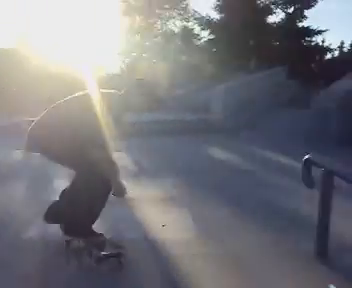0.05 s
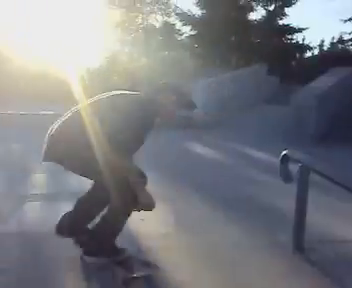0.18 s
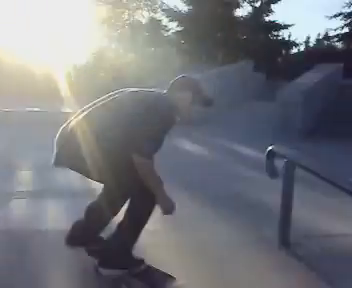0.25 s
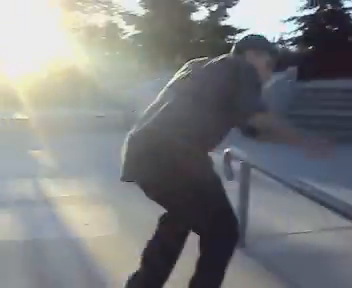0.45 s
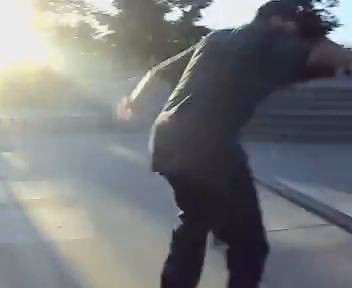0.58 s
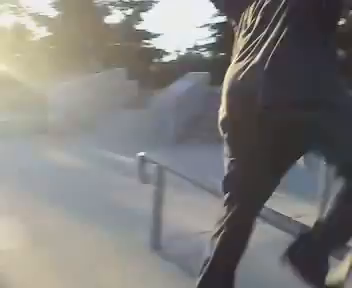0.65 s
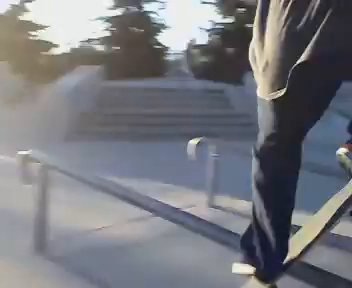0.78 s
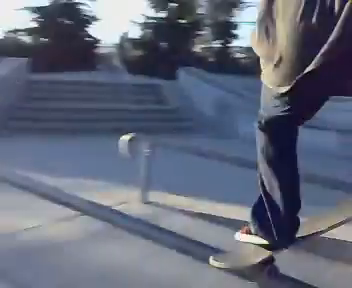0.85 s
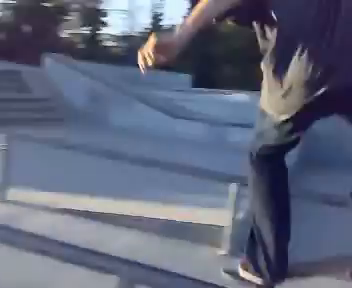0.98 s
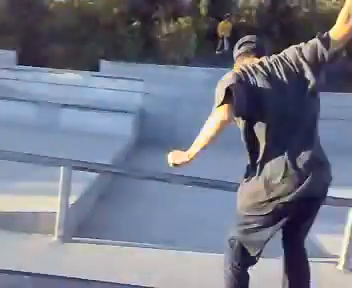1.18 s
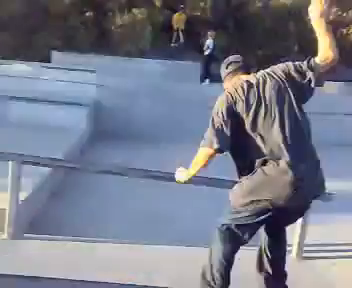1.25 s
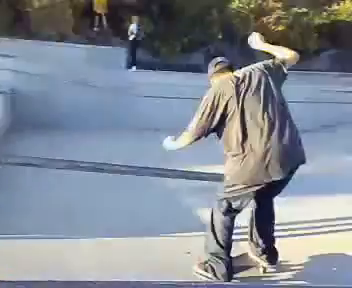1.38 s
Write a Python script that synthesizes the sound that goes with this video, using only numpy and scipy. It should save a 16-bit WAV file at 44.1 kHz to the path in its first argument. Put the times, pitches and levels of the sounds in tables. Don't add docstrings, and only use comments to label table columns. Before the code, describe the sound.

A skateboard rolls on rough concrete with a seam clack and small wooden knocks, then a hard distorted tail pop and quick clattering contact, in an open skatepark with faint traffic, heard through a small close camera microphone.

```python
import sys
import numpy as np
from scipy import signal
from scipy.fft import rfft, irfft, next_fast_len
from scipy.io import wavfile
from scipy.ndimage import map_coordinates

SR = 44100
rng = np.random.default_rng(int(sys.argv[2]) if len(sys.argv) > 2 else 0)


def wav_record(signal):
    frames = np.transpose(np.atleast_2d(signal))
    bounded = np.clip(frames, -1, 1)
    quanta = np.round(bounded * 32767).astype(np.int16)
    wavfile.write(sys.argv[1], SR, quanta)


def voltage_ratio(decibels):
    exponent = np.asarray(decibels, float) / 20
    return 10 ** exponent


N = 61739

# pitch_hz, level_db (per Hz)
TRAFFIC_TONE = [(25, 0.5), (55, -7), (125, -8.5), (260, -15), (550, -49), (1500, -22), (3200, -45),
                (7800, -47.5)]
TRAFFIC_DB = -29

# time_s, rolling_level_db, rider_weight_db
ROLL = [(0, -40, 3), (.1, -41, -2), (0.201, -40, 0.5), (.29, -33, -2), (0.422, -35.5, -1),
        (0.461, -35.5, -3.5), (0.501, -32.5, -1), (0.571, -37, 2), (0.691, -31, -1.5), (0.759, -35, -1.5),
        (.85, -30.5, -2), (.93, -30.5, -11.5), (1.001, -35, 3.5), (1.07, -37, -5.5), (1.2, -38, -6.5),
        (1.4, -42.5, -1.5)]
# pitch_hz, level_db (per Hz)
GRIT_TONE = [(240, -31.5), (400, -16.5), (519, -5), (1180, -1), (1290, -2.5), (2310, -5), (2710, -31),
             (5860, -19.5), (7800, -59.5), (10100, -73.5), (17200, -120)]
# pitch_hz, width_hz, level_db
DECK_HUM = [(96.4, 9.85, 2), (165.2, 67.9, -6), (266.3, 68, -5), (398, 79.6, -8.5), (793.3, 134, -6),
            (932, 200, -19)]
HUM_OVER_GRIT_DB, GRAINS_PER_S, GRAIN_SPREAD_DB = 2.5, 900, 1.5

# peak_s, level_db, rise_s, fall_s, pitch_hz
SCUFFS = [(0.7098, -45, 0.062, 0.022, 5656), (0.8941, -36.5, 0.017, 0.041, 5746),
          (0.0157, -38, 0.083, 0.327, 609.5), (0.8307, -31.5, 0.072, 0.071, 966),
          (0.8616, -34.5, 0.117, 0.12, 777), (0.8845, -36, 0.24, 0.025, 1738),
          (0.295, -42, 0.028, 0.012, 5385), (0.76, -42.5, 0.183, 0.45, 2392),
          (0.5155, -42.5, 0.09, 0.18, 2246), (0.951, -25.5, 0.024, 0.05, 1630),
          (.2422, -20, 0.0019, 0.0033, 5080), (.9485, -6, 0.000967, 0.00249, 5236),
          (.245, -31, 0.0064, 0.0071, 3086), (1.09, -18, .0025, 0.003, 4400),
          (1.103, -26, 0.0011, .004, 5220), (1, -32, 0.0218, 0.024, 733),
          (1.096, -22.5, 0.01, 0.0075, 1633), (.992, -29.5, .002, 0.0019, 4000),
          (0.4653, -46.5, 0.028, 0.032, 2297), (.64, -39.5, 0.007, 0.017, 2540)]
SCUFF_WIDTH = 0.213

# peak_s, pitch_hz, level_db, length_s
FLEXES = [(.103, 262, -33, .037), (.105, 93, -30, .06), (.283, 112, -29.5, .044), (.33, 320, -34.5, .018),
          (.42, 92, -27, .1), (.409, 250, -27, .016), (.506, 262, -28, .05), (.5, 90, -29, .045),
          (.665, 168, -32, .06), (.732, 55, -29.5, .1), (.875, 88, -24, .055), (1.045, 88, -29, .04),
          (1.105, 125, -28, .05), (1.17, 55, -28, .08), (1.32, 52, -29, .1), (1.365, 123, -30, .034),
          (.8, 405, -35, .1), (.72, 80, -30, .04), (1.24, 60, -30, .04)]
# peak_s, pitch_hz, level_db, length_s
THUD = (.952, 350, -14, .009)

# start_s, truck_rattle_db, deck_knock_db, deck_pitch_hz, length_s
CONTACTS = [(0.2394, -14, -18, 800, 0.016), (0.2433, -19.5, -5, 1354, 0.0342),
            (0.268, -30.5, -30.5, 1476, 0.049), (0.279, -27, -53, 1520, 0.11),
            (0.3167, -32, -13.5, 2228, 0.00455), (0.339, -21, -21, 1113, 0.016),
            (.4030, -49.5, -10.5, 697, 0.015), (.4075, -35, -8, 345, 0.0201),
            (0.498, -45, -17.5, 400, 0.0086), (0.629, -33.5, -34.5, 2230, 0.015),
            (0.834, -42.5, -16.5, 990, 0.0077), (0.85, -43, -19, 1010, .012),
            (0.852, -41, -17, 967, 0.0086), (0.87, -34, -14.5, 780, 0.013),
            (0.937, -25.5, -13.5, 901, 0.012), (0.9708, -14.5, -24, 1700, 0.0061),
            (0.9901, -9, -21.5, 1470, 0.0071), (0.9965, -26.5, -27.5, 1600, 0.007),
            (1.0222, -22.5, -14, 1700, 0.0068), (1.032, -26, -26.5, 1500, 0.018),
            (1.0863, -13.5, -18.5, 1960, 0.012), (1.0885, -15.5, -4.5, 1543, 0.031),
            (1.1022, -15, -17.5, 1600, 0.015), (1.114, -22, -11, 1430, 0.034),
            (1.121, -39, -7.5, 1482, 0.015), (1.127, -21, -29.5, 1504, 0.014),
            (1.137, -20, -41, 1524, 0.018), (1.097, -15, -22, 1500, 0.016), (1.152, -29, -40, 1518, 0.0646)]
# start_s, truck_rattle_db, deck_knock_db, deck_pitch_hz, length_s
POP = [
    (.9472, 3, -6, 1900, .006),
    (.9488, -8, 12, 1680, .013),
    (.9545, -11, -6, 1200, .014),
    (.9605, -8, 0, 900, .011),
]
# pitch_hz, level_db, t60_s
WOOD = [(345, -13.5, 0.026), (752.3, -5, 0.0483), (1001, 2.5, 0.01106), (1404, -5.5, 0.0371),
        (1565, -3, 0.042), (1764.2, 0, 0.02467), (2146.5, -7.5, 0.0465), (2438.5, -10.5, 0.045)]
# pitch_hz, width_hz, level_db
TRUCKS = [(3096, 487, -6), (4090, 550, -4.5), (4566, 365, -1.5), (5240, 150, 1), (5722, 240, -5),
          (6181, 110, -5.5), (6890, 1500, -11)]
SPEAK_OCTAVES, CRACK_DB, TRUCK_TOP_HZ = 1, 8.5, 6580
STRIKE_DB, SHARP_S, RISE_SHARE = 13.5, 0.00381, 0.0665

# pitch_hz, t60_s
BANKS_DECAY = [(300, 0.39), (1800, 0.351), (5000, 0.764), (8000, 0.43)]
BANKS_DB, BANKS_DELAY_S = -14, .006

# pitch_hz, level_db
MIC = [(20, -27.5), (45, -1), (7400, 0.5), (7700, -13), (8000, -58), (8300, -63), (20000, -120)]
# pitch_hz, level_db
IMAGE = [(7900, -93), (8250, -5.5), (8600, -17.5), (9000, -32.5), (9400, -92.5), (20000, -140)]
SAMPLING_HZ = 16000
INPUT_TOP, INPUT_HARD = .72, 6
PEAK_TOP, PEAK_HARD = .72, 30


def unit(x):
    return x / np.sqrt(np.mean(x ** 2) + 1e-20)


def along(points, hz):
    f, v = np.transpose(points)
    return np.interp(np.log(hz + 1), np.log(f + 1), v)


def wobble(rate):
    knots = rng.standard_normal(int(N * rate / SR) + 4)
    return map_coordinates(knots, [np.arange(N) * rate / SR])


def filtered(x, response):
    m = next_fast_len(x.shape[-1] + SR // 2)
    spectrum = rfft(x, m) * response(np.fft.rfftfreq(m, 1 / SR))
    return irfft(spectrum, m)[..., :x.shape[-1]]


def toned(x, points):
    return filtered(x, lambda hz: voltage_ratio(along(points, hz)))


def resonant(peaks):
    def response(f):
        total = 0
        for k, (center, width, db) in enumerate(peaks):
            damping = 1j * f * width
            total = total + (-1) ** k * voltage_ratio(db) * damping / (center * center - f * f + damping)
        return total
    return response


def traffic():
    level_db = TRAFFIC_DB + 2.2 * wobble(12.923)
    return voltage_ratio(level_db) * unit(toned(rng.standard_normal(N), TRAFFIC_TONE))


def gravelly(noise_db):
    hit = rng.random(N) < GRAINS_PER_S / SR
    ticks = hit * rng.standard_normal(N) * voltage_ratio(GRAIN_SPREAD_DB * rng.random(N))
    return unit(ticks) + voltage_ratio(noise_db) * rng.standard_normal(N)


def wheels():
    s, strength_db, weight_db = np.transpose(ROLL)
    t = np.arange(N) / SR
    level_db = np.interp(t, s, strength_db) + .7 * wobble(40)
    grit = unit(toned(gravelly(noise_db=5.5), GRIT_TONE))
    deck = resonant(DECK_HUM)
    hum = unit(filtered(gravelly(noise_db=3.0), lambda hz: deck(hz) / (1 + (hz / 1500) ** 4)))
    hum_db = HUM_OVER_GRIT_DB + np.interp(t, s, weight_db) + 1.51 * wobble(13.85)
    return voltage_ratio(level_db) * (grit + voltage_ratio(hum_db) * hum)


def scuffs():
    t, out = np.arange(N) / SR, np.zeros(N)
    for s, db, rise, fall, hz in SCUFFS:
        band = resonant([(hz, SCUFF_WIDTH * hz, 0)])
        hiss = unit(filtered(rng.standard_normal(N), lambda f: band(f) ** 2))
        swell = np.exp(-np.where(t < s, (s - t) / rise, (t - s) / fall) ** 2)
        out += voltage_ratio(db) * swell * hiss
    return out * voltage_ratio(0.84 * wobble(91.2))


def flex():
    t, out = np.arange(N) / SR, np.zeros(N)
    drift = np.cumsum(1 + 0.0381 * wobble(30.22)) / SR
    for s, hz, db, length in FLEXES + [THUD]:
        swell = np.exp(-2 * ((t - s) / length) ** 2)
        out += voltage_ratio(db + 0.5) * swell * np.sin(2 * np.pi * hz * drift)
    return out


def deck_ring(speak_hz, t, uneven):
    ring, modes = np.zeros(len(t)), len(WOOD)
    for k, (hz, db, t60) in enumerate(WOOD):
        octaves_off = np.log2(hz / speak_hz) / SPEAK_OCTAVES
        level_db = db + 3.21 * uneven[-1 - k] - 6.25 * octaves_off ** 2
        pitch_hz = hz * (1 + 0.0052 * uneven[-1 - modes - k])
        ring += voltage_ratio(level_db - 60 * t / t60) * np.sin(2 * np.pi * pitch_hz * t)
    return ring


def board():
    shake, knock, t = np.zeros(N + SR), np.zeros(N + SR), np.arange(SR // 5) / SR
    for s, rattle_db, knock_db, speak_hz, length in POP + CONTACTS:
        at = round(s * SR)
        sharpness = SHARP_S / length
        scrape = np.sign(rng.standard_normal(len(t)))
        uneven = rng.standard_normal(2 * len(WOOD))
        shake[at:][:len(t)] += voltage_ratio(rattle_db - 25 * t / length) * scrape
        shake[at] += voltage_ratio(rattle_db + STRIKE_DB) * sharpness
        rise = 1 - np.exp(-t / (RISE_SHARE * length))
        crack = sharpness * voltage_ratio(CRACK_DB - 5.26 * t * speak_hz) * np.sin(2 * np.pi * speak_hz * t)
        body = rise * deck_ring(speak_hz, t, uneven) + crack
        knock[at:][:len(t)] += voltage_ratio(knock_db - 8.5 - 4 * t / length) * body
    metal = resonant(TRUCKS)
    rattle = filtered(shake[:N], lambda hz: metal(hz) / (1 + 1j * (hz / TRUCK_TOP_HZ) ** 3))
    return knock[:N] + voltage_ratio(6.5) * rattle


def banks(x):
    hz, t, z = signal.stft(rng.standard_normal(SR // 2), SR, nperseg=256)
    decay = voltage_ratio(-60 * t / along(BANKS_DECAY, hz)[:, None])
    tail = signal.istft(z * decay, SR, nperseg=256)[1]
    late = np.pad(x, (round(BANKS_DELAY_S * SR), 0))
    return signal.fftconvolve(late, tail / np.linalg.norm(tail))[:N]


def scene():
    hits = board()
    answer = voltage_ratio(BANKS_DB) * banks(hits)
    return (hits + answer + wheels() + flex() + scuffs() + traffic())[None]


def overloaded(x, top, hard):
    return x / (1 + np.abs(x / top) ** hard) ** (1 / hard)


def roll_off(x):
    return signal.sosfilt(signal.butter(12, 16670, fs=SR, output="sos"), x)


def record(dry):
    x = toned(overloaded(dry, INPUT_TOP, INPUT_HARD), MIC)
    mirror = 2 * x * np.cos(2 * np.pi * SAMPLING_HZ * np.arange(N) / SR)
    x = x + toned(mirror, IMAGE)
    return roll_off(overloaded(x, PEAK_TOP, PEAK_HARD))


dry = scene()
out = record(dry)
wav_record(out)
```